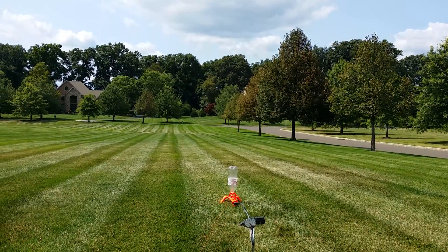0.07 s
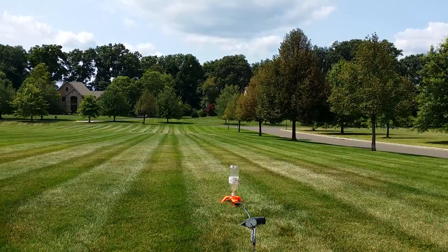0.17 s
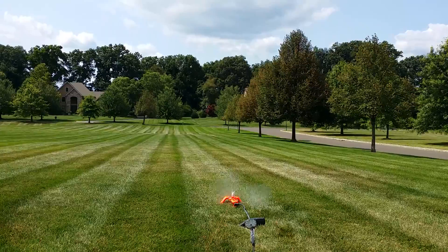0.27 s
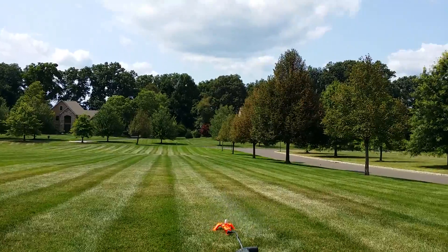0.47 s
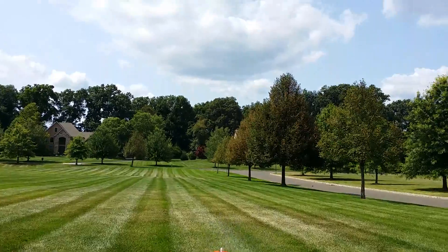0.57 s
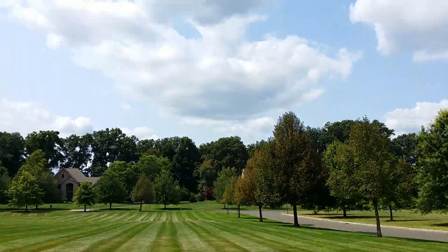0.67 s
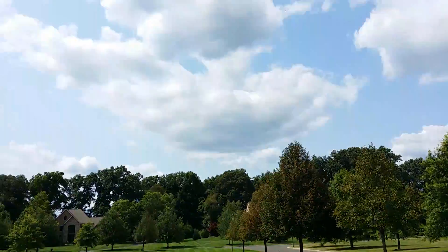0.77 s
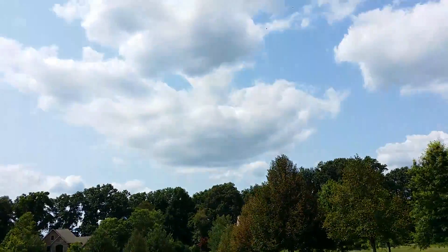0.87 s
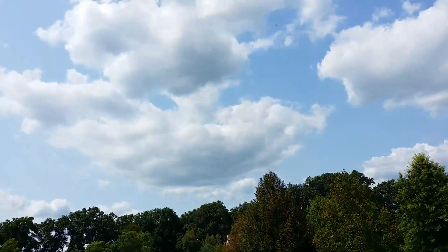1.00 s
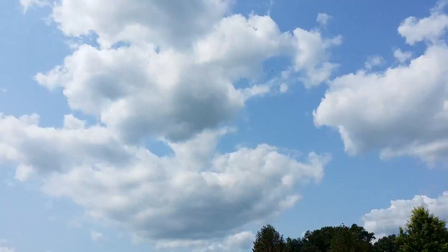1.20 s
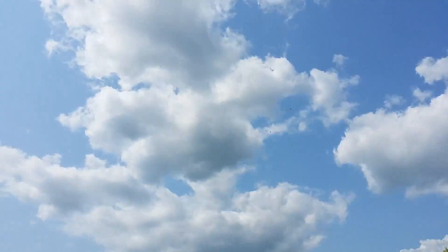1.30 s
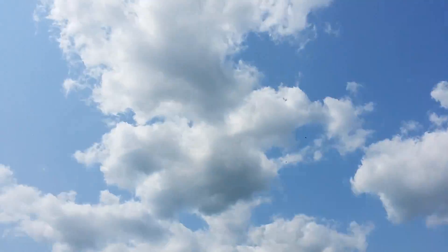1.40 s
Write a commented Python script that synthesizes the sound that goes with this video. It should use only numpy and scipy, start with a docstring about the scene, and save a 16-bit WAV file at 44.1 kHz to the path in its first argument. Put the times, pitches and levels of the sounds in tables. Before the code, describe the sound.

A water rocket launches on an open lawn, a few metres away. At about 0.2 seconds its plastic latch snaps sharply; at 0.3 it pops free with a thump and a short hiss of spray, echoing off houses and trees. Something tiny taps the microphone at 0.8 seconds, and soft handling ticks and knocks follow until 1.4, over faint wind, leaves and insects.

```python
"""Faint insects and wind, then a plastic latch snaps open: a water rocket launches on an open lawn.
The neck pops free, and water and air burst out with a thump and a hiss of spray. Houses and trees
echo it. The perspective is a hand-held phone a few metres away: something small, perhaps a drop,
taps one microphone port, and the phone ticks and knocks as it is tilted up."""
import sys
import numpy as np
from scipy import signal
from scipy.fft import rfft, irfft
from scipy.io import wavfile

SR = 44100
rng = np.random.default_rng(int(sys.argv[2]) if len(sys.argv) > 2 else 0)


def int16_out(signal):
    """Quantize to a 16-bit WAV file."""
    q = np.round(np.clip(np.atleast_2d(signal).T, -1, 1) * 32767)
    wavfile.write(sys.argv[1], SR, q.astype(np.int16))


N = 63945
NEAR_APART_HZ, FAR_APART_HZ = 11000, 480  # near and far noise turn wide above these
POP_S = .3074  # the moment of launch


def undb(db):
    """Decibels to gain."""
    return 10 ** (np.asarray(db) / 20)


def since(start):
    """Seconds since a moment, zero before it."""
    return np.maximum(np.arange(N) / SR - start, 0)


def fader(points):
    """Gain ride through (time [s], level [dB]) points."""
    return undb(np.interp(since(0), *np.array(points).T))


def freqs():
    """Frequencies of the filter bins."""
    return np.maximum(np.arange(N + 1) * SR / (2 * N), 1)


def along(points):
    """(frequency [Hz], value) points joined on a log-frequency axis."""
    hz, value = np.array(points).T
    return np.interp(np.log(freqs()), np.log(hz), value)


def hump(hz, octaves):
    """A broad resonance, in dB."""
    offset = np.log2(freqs() / hz) / octaves
    return -20 * np.log10(1 + offset ** 4 / 2 + offset ** 2 / 2)


def colour(x, db):
    """Minimum-phase EQ with the given dB shape; white noise keeps its power."""
    gain = undb(db) / np.sqrt(np.mean(undb(db) ** 2))
    cepstrum = irfft(np.log(gain + 1e-7))
    cepstrum[1:N] *= 2
    cepstrum[N + 1:] = 0
    return irfft(rfft(x, 2 * N) * np.exp(rfft(cepstrum)))[..., :N]


def steep(x, hz, kind):
    """Fourth-order high-pass or low-pass."""
    return signal.sosfilt(signal.butter(4, hz, kind, fs=SR, output="sos"), x)


def noise(apart_hz):
    """Noise at both ports: alike in the bass, unrelated in the treble."""
    mid, side = rfft(rng.standard_normal((2, 2 * N)))
    like = .97 / (1 + (freqs() / apart_hz) ** 2)
    return irfft(mid * np.sqrt((1 + like) / 2) + side * np.sqrt((1 - like) / 2) * [[1], [-1]])[:, :N]


def burst(start, attack, hold, release):
    """Linear attack, hold, exponential release, in seconds."""
    return np.minimum(since(start) / attack, 1) * np.exp(-since(start + attack + hold) / release)


def ring(start, modes):
    """Damped modes struck at one moment."""
    t = since(start)
    return sum(undb(db - 60 * t / t60) * np.sin(2 * np.pi * hz * t) for hz, db, t60 in modes)


def pan(db):
    """Left and right gains for a level difference."""
    return undb(np.array([[1], [-1]]) * db / 2)


def late(x, delay):
    """The same sound, later."""
    return np.array([np.interp(since(0) - delay, since(0), side, left=0) for side in x])


def smear(x, eq, delay, rise, decay):
    """Many small reflections that arrive together and fade."""
    fade = burst(delay, rise, 0, decay)
    response = colour(noise(FAR_APART_HZ) * fade / np.linalg.norm(fade), along(eq))
    return signal.fftconvolve(x, response, axes=1)[:, :N]


# Tone of the leaf hiss and the wind (frequency [Hz], level [dB])
LEAVES_EQ = [(100, -7), (250, -2.5), (450, -8.5), (900, -6), (1400, -8.5), (2500, -9.5), (4500, -12.5),
             (9000, -13), (14000, -22), (15000, -28.5)]
WIND_EQ = [(20, -31), (45, -16.5), (80, 0), (150, -5), (260, -19), (600, -37.5), (2000, -61.5)]
# Fader rides of the ambience bed (time [s], level [dB])
LEAVES_RIDE = [(0, -66.5), (.2, -66), (.6, -64.5), (1.0, -70), (1.25, -69.5), (1.41, -62), (1.45, -63.5)]
INSECT_RIDE = [(0, -67), (.2, -68), (.7, -70), (1.1, -79.5), (1.45, -69)]
WIND_RIDE = [(0, -65.5), (.7, -66), (1.0, -72), (1.28, -72.5), (1.35, -63.5), (1.45, -64.5)]
def ambience():
    """Soft hiss of leaves, a band of distant insects and a low rumble of wind."""
    leaves = fader(LEAVES_RIDE) * colour(noise(FAR_APART_HZ), along(LEAVES_EQ))
    insects = fader(INSECT_RIDE) * colour(noise(FAR_APART_HZ), hump(hz=6460, octaves=.23))
    wind = fader(WIND_RIDE) * colour(noise(FAR_APART_HZ), along(WIND_EQ))
    return leaves + insects + wind


# Handling hits (time [s], level [dB], centre [Hz], width [octaves], decay [s], pan L-R [dB])
HANDLING_HITS = [(.7815, -51, 8000, 1.6, 0.00064, -3), (1.074, -66.5, 1000, .3, 0.01, -4),
                 (1.165, -49.5, 1400, 0.66, 0.0038, -7), (1.166, -55.5, 7030, 0.39, .004, 3),
                 (1.302, -60.5, 399, 1.1, 0.0045, -4), (1.404, -55, 553, 0.49, 0.0043, -15.5),
                 (1.410, -52, 480, 1.07, 0.0047, -6), (1.420, -52.5, 138, 0.43, .008, -10)]
def handling():
    """The phone ticks and knocks in the hand as it is tilted up."""
    out = 0
    for start, db, hz, octaves, decay, pan_db in HANDLING_HITS:
        tick = noise(NEAR_APART_HZ) * burst(start, .00031, 0, decay)
        out = out + undb(db) * pan(pan_db) * colour(tick, hump(hz, octaves))
    return out


# Tight ring of the tapped port (frequency [Hz], level [dB], t60 [s])
TAP_MODES = [(770, -19, 0.0044), (1400, -8, .006), (2500, -3, 0.0015)]
def port_tap():
    """Something drop-sized, too small to make bass, taps the right port."""
    tap = steep(ring(start=.8242, modes=TAP_MODES), 4500, "low")
    return undb(-29.5) * pan(-24) * steep(tap, 292, "high")


# Reverb bands of grass and trees (frequency [Hz], level [dB], t60 [s])
TAIL_BANDS = [(120, -20, 1.7), (300, -36.5, .9), (700, -30, 1.1), (1100, -33, 1.2), (1700, -24, 1.35),
              (2630, -25, 1.4), (3880, -20.5, 1.3), (5300, -24, 0.72), (7000, -23, .65), (10000, -20, .38),
              (13500, -26, .25)]
# Tone of the late answer from the trees (frequency [Hz], level [dB])
TREES_EQ = [(150, -0.5), (300, -4), (650, 1), (1100, -6), (1600, -6.5), (2100, 6), (2700, -6.5),
            (4200, 2.5), (5500, 1.5), (7000, -2.5), (10000, -4.5), (14000, -11.5)]
def lawn_reverb(x):
    """Diffuse echo of the surroundings: the treble dies first, and a group of trees answers late."""
    field, tail = rfft(noise(FAR_APART_HZ), 2 * N), 0
    for hz, db, t60 in TAIL_BANDS:
        crossover = along([(row[0], float(row[0] == hz)) for row in TAIL_BANDS])
        band = irfft(field * crossover)[:, :N]
        fade = burst(0, attack=.012, hold=0, release=t60 / np.log(1000))
        tail = tail + undb(db) * band * fade / np.linalg.norm(fade)
    trees = undb(-25) * smear(x, TREES_EQ, delay=.116, rise=.005, decay=.056)
    return signal.fftconvolve(x, tail, axes=1)[:, :N] + trees


# Slapback taps of the boom (delay [s], level [dB])
SLAPS = [(0.023, -13), (.049, -11.5), (.121, -17), (.137, -22), (0.176, -28.5), (.231, -25.5), (.298, -23),
         (.433, -36)]
def slapback(thump):
    """Houses and trees throw back the low end of the boom."""
    dull = steep(thump, 202, "low")
    return sum(undb(db) * late(dull, delay) for delay, db in SLAPS)


# Tone of the early reflections (frequency [Hz], level [dB])
GRASS_EQ = [(1000, -3.5), (2800, -5), (4300, 2), (6500, -0.5), (8100, -9.5), (10500, 2), (14000, -4.5)]
def grass_scatter(snaps):
    """The snaps scatter in the grass nearby."""
    return undb(-17) * smear(snaps, GRASS_EQ, delay=.004, rise=.008, decay=.02)


# Stereo lean of the direct sound (frequency [Hz], pan L-R [dB])
PORT_PAN = [(100, 1), (380, 2.5), (700, -2), (1290, -6.5), (2380, -7.5), (4400, 6), (8100, -0.5),
            (15000, 0.5)]
def ports(x):
    """The phone's body colours the launch differently at each port; the right hears it later."""
    shade_db, lag_s = along(PORT_PAN) / 2, 25e-6
    left, right = colour(x[0], shade_db), colour(x[1], -shade_db)
    lag = np.exp(-2j * np.pi * freqs() * lag_s)
    return np.array([left, irfft(rfft(right, 2 * N) * lag)[:N]])


# Tone of the spray (frequency [Hz], level [dB])
SPRAY_EQ = [(35, -22), (60, -15), (130, -10), (300, -15), (700, -24), (1900, -19), (3800, -14.5),
            (7000, -14.5), (11000, -23), (14000, -21.5), (15000, -33.5)]
def spray():
    """A cloud of fine droplets hisses behind the rising bottle."""
    grain = undb(1.5 * np.repeat(rng.standard_normal(N // 32 + 1), 32)[:N])
    hiss = noise(FAR_APART_HZ) * grain * burst(POP_S, attack=.01, hold=.042, release=.023)
    return undb(-30) * colour(hiss, along(SPRAY_EQ))


# Latch hits (time [s], level [dB], ring send [dB], treble tilt [dB/octave])
LATCH_HITS = [(0.2265, -10.5, -10, -1.5), (0.2358, -3.5, -12.5, 1.5), (0.2528, -18.5, -14, 0.28)]
# Tone of each crack (frequency [Hz], level [dB])
CRACK_EQ = [(100, -46), (380, -36), (580, -10), (750, -13), (1130, -3), (1500, -10), (1930, -2), (2250, -6),
            (2700, -4), (3600, -10), (5500, -10.5), (8100, -2), (10600, -19), (13200, -9), (15000, -18)]
# Ring of launcher and bottle (frequency [Hz], level [dB], t60 [s])
PLASTIC_MODES = [(599.4, -12.5, .04), (1120, -4, .03), (1348, -25, 0.18), (1932, -3, .035), (2700, -5, .02),
                 (4370, -13.5, .04), (6900, -3.5, 0.017)]
def latch():
    """Sharp plastic snaps ring launcher and bottle and bounce off the ground."""
    out = 0
    for start, db, ring_db, tilt_db in LATCH_HITS:
        tone_db = along(CRACK_EQ) + tilt_db * np.log2(freqs() / 3000)
        crack = colour(noise(NEAR_APART_HZ) * burst(start, .0001, 0, release=.0019), tone_db)
        body = undb(ring_db) / 2 * ring(start, PLASTIC_MODES)
        out = out + undb(db) * (crack + body)
    bounce = undb(-12.5) * late(out, delay=.0023)
    return steep(out + bounce, 553, "high")  # small parts radiate no bass


# Low-end pulses of the boom (frequency [Hz], level [dB], half-length [s])
BOOM_PULSES = [(55, -40.5, .012), (154, -16.5, .0036), (318, -22, 0.0046)]
def boom():
    """The freed air swells and swings for a cycle or two, peaking just after the pop."""
    t = since(0) - POP_S - .0048
    swing = sum(undb(db) * np.exp(-(t / half) ** 2 / 2) * np.cos(2 * np.pi * hz * t)
                for hz, db, half in BOOM_PULSES)
    fade_in = np.minimum(since(POP_S - .002) / .003, 1)
    return pan(1.5) * fade_in * swing


# Tone of the neck's pop and of the jet (frequency [Hz], level [dB])
POP_EQ = [(100, -20.5), (400, -6), (850, -2.5), (1300, -4.5), (2100, 2.5), (4000, -6.5), (15000, -20.5)]
JET_EQ = [(120, -25.5), (300, -10), (550, -16.5), (1000, -15.5), (1400, -15), (1900, -7), (2200, -12.5),
          (2650, -4), (3200, -7), (5800, -11.5), (6500, -3.5), (7150, 3.5), (7700, -4.5), (8500, -5.5),
          (9500, -11.5), (11400, -17.5), (14000, -8), (15000, -15.5)]
def blast():
    """The neck pops free and the jet empties the bottle in about a hundredth of a second."""
    pop = noise(NEAR_APART_HZ) * burst(POP_S, attack=.0001, hold=0, release=.0012)
    jet = noise(NEAR_APART_HZ) * burst(POP_S - .001, attack=.0022, hold=.0086, release=.0042)
    return undb(-3.5) * colour(pop, along(POP_EQ)) + undb(-8.5) * colour(jet, along(JET_EQ))


def scene():
    """Launch, echoes and surroundings at the two microphone ports."""
    snaps, thump = latch(), boom()
    direct = snaps + blast() + thump
    launch = ports(direct) + grass_scatter(snaps) + spray()
    return launch + slapback(thump) + lawn_reverb(direct) + port_tap() + handling() + ambience()


def record(dry):
    """The phone sheds the deepest rumble, rounds the loudest peaks and cuts the top."""
    low_cut_hz, ceiling, high_cut_hz = 38, 1.2, 14650
    thin = signal.sosfilt(signal.butter(2, low_cut_hz, "high", fs=SR, output="sos"), dry)
    rounded = ceiling * np.tanh(thin / ceiling)
    return signal.sosfilt(signal.ellip(8, .2, 70, high_cut_hz, fs=SR, output="sos"), rounded)


dry = scene()
out = record(dry)
int16_out(out)
```